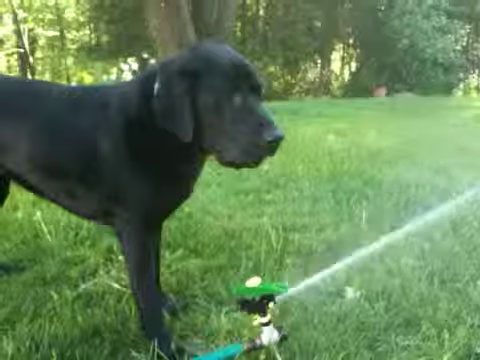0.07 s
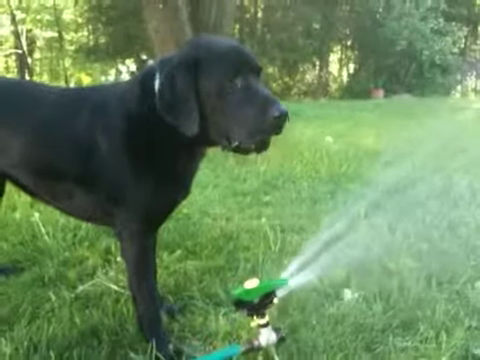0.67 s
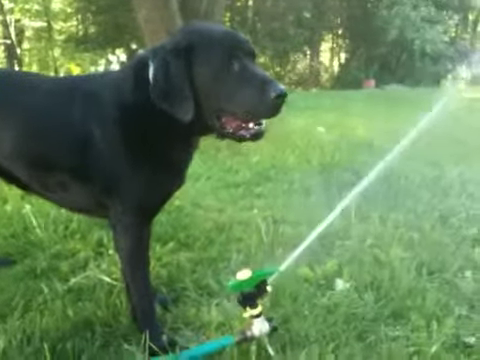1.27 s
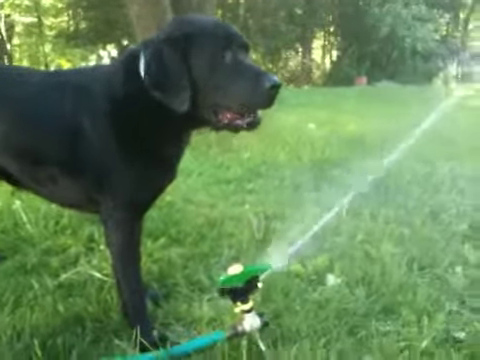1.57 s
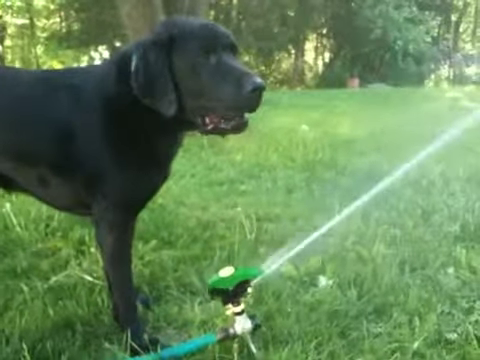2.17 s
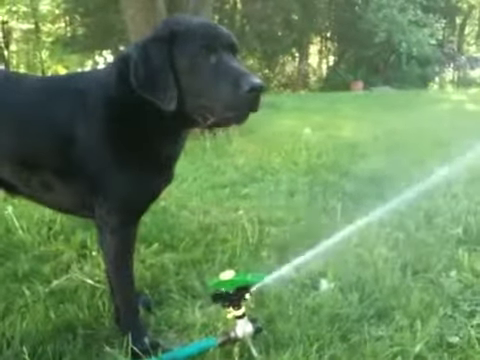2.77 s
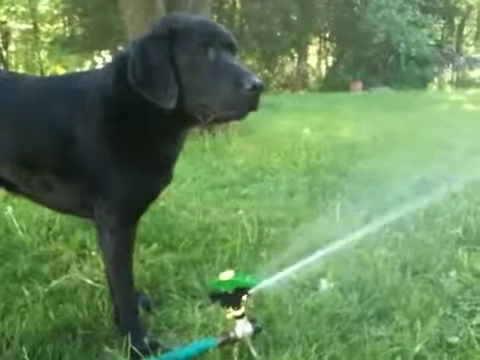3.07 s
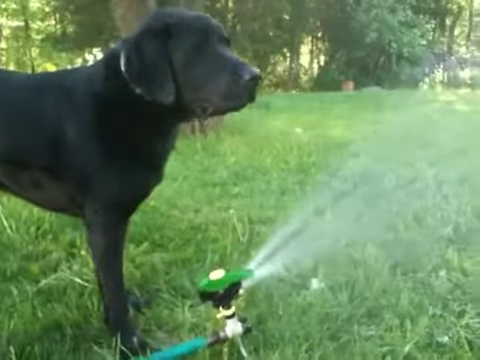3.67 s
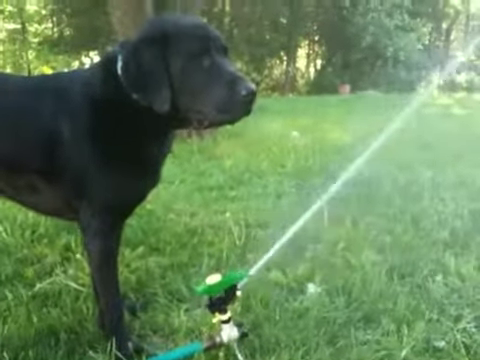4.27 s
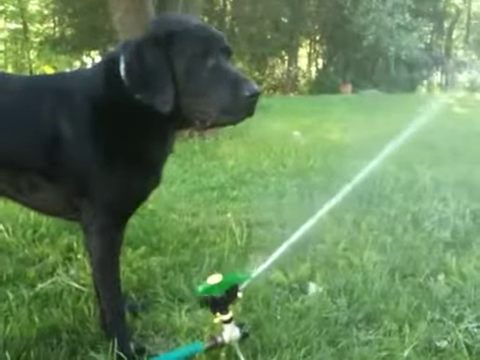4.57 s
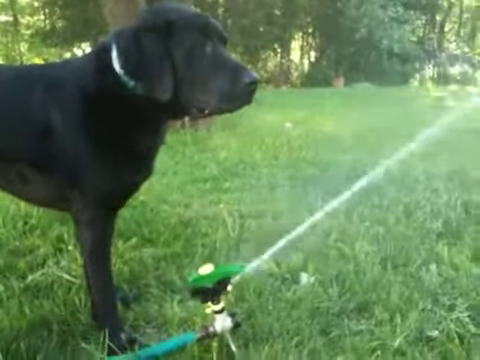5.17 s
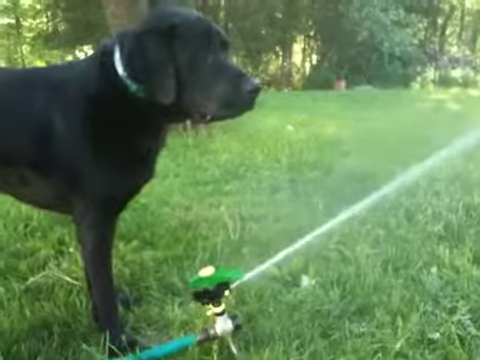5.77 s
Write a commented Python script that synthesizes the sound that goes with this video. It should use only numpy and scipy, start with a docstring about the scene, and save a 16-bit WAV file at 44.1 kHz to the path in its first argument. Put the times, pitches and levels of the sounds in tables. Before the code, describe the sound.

An impact sprinkler is heard close up on a lawn, its water jet hissing throughout. The sound starts just after the beginning with two sharp, wet ticks. From about 0.3 to 1.1 seconds the arm chatters quickly, roughly thirty short bursts of spray a second. At 1.2 seconds it settles into even ticking, about eight strokes a second, each a hard clack with a splash and a very short metallic ring. Around 2 seconds the hiss flares briefly and turns from broad to thinner and brighter. From 3.3 to 4.1 seconds the fast ratcheting chatter returns, with the spray swelling. Regular ticking resumes at about 4.2 seconds and carries on until the end, near 6 seconds. Soft outdoor air lies behind everything, with a few very faint, short, distant hoots at the start and around 2.4 seconds.

```python
"""A garden lawn, with a small microphone close to an impact sprinkler. The sprung arm slaps into the jet
eight times a second, tears up the water, cracks against the frame and steps the head round. Twice the
trip lever flips and the arm chatters the head back in short, fast strokes. Between strokes the jet
hisses, broad at first, then keen. Behind it lie soft outdoor air and a few faint, far hoots."""
import sys
import numpy as np
from scipy import signal
from scipy.fft import rfft, irfft, next_fast_len
from scipy.io import wavfile
from scipy.ndimage import uniform_filter1d, map_coordinates

SR = 44100
rng = np.random.default_rng(int(sys.argv[2]) if len(sys.argv) > 2 else 0)


def unload_wav(signal):
    """Save mono or channel-first audio to the path in sys.argv[1] as 16-bit WAV at rate SR, clipped to [-1, 1]."""
    wavfile.write(
        sys.argv[1],
        SR,
        np.round(np.clip(np.atleast_2d(signal).T, -1, 1) * 32767).astype(np.int16),
    )


N = 260631

# Open air all round the microphone. Each row: frequency in Hz, relative level in dB.
AIR_COLOUR = [(25, -33.5), (80, -14.5), (170, 0), (280, -2), (420, -2.5), (800, -0.5), (1500, -3.5),
              (4000, 3), (16000, -18.5)]
# Hoots, far off. Each row: start in seconds, length in seconds, pitch in Hz, level in dB.
FAR_HOOTS = [(0.137, 0.04, 561, -61.5), (0.258, 0.077, 629, -64.5), (2.37, 0.085, 710, -61.5),
             (2.495, 0.056, 656, -57.5)]

# The hiss turns from broad to keen. Each row: time in seconds, keen share from 0 to 1.
KEEN_SHARE = [(1.4, 0), (1.8, 0.46), (2.3, 0.93), (5.9, 0.99)]
# The free jet, broad and keen, and its brief flare. Each row: frequency in Hz, relative level in dB.
BROAD_JET_COLOUR = [(60, -40), (300, -34), (1200, -5), (1800, -8), (2500, -18.5), (3500, -8), (4400, -1),
                    (5300, 2), (6400, -1), (7400, 1), (10000, 0.5), (12500, -1), (14000, -6), (16000, -14)]
KEEN_JET_COLOUR = [(60, -54), (300, -32.5), (1200, -13), (2900, -14), (3700, -5.5), (5000, -1),
                   (6750, -10.5), (7500, 2), (8700, 4.5), (9700, -9), (11200, -17), (12600, 3.5),
                   (14000, -17.5), (15200, -4), (16000, -9.5)]
TREBLE_FLARE_COLOUR = [(1000, -14), (4000, 6.5), (7000, -21), (10000, 10), (14000, 6), (16000, -9.5)]
# Resonances and notches of nozzle and head. Each row: centre in Hz, width in Hz, lift in dB.
NOZZLE_MODES = [(1802, 226, 11), (2789, 220, 9), (3548, 130, 8), (3890, 140, -3.5), (3990, 170, 7.5),
                (5560, 300, 2.5), (6100, 280, 11), (6100, 170, -1), (7100, 140, 10), (7460, 160, 12),
                (7400, 150, -9), (7820, 182, 4), (9540, 400, 0), (10360, 290, 9), (11330, 250, -7),
                (11670, 320, 7)]
# The band a reflection colours as the head turns. Each row: time in seconds, centre in Hz, gain in dB.
REFLECTION_BAND = [(1.4, 4400, 3.5), (1.65, 4700, -15), (1.8, 5500, -11), (2.05, 5630, -3), (2.3, 6350, -3),
                   (2.85, 6450, 3), (3.2, 6560, -15), (4.3, 6650, -2.5), (4.6, 5370, -3), (5.9, 6720, -1)]
# Three bands of hiss that come and go at the nozzle. Each row: time in seconds, pitch in Hz, level in dB.
HIGH_HISS = [(.1, 8700, -54), (1.5, 8360, -57.5), (2.3, 8440, -69.5), (2.85, 8750, -44), (3.25, 8450, -67),
             (4.25, 8430, -44), (4.65, 8480, -45.5), (5.0, 8550, -53), (5.9, 8840, -52)]
THIN_WHISTLE = [(.1, 6350, -57), (1.35, 6260, -54.5), (1.52, 6370, -56.5), (1.76, 6630, -53),
                (2.1, 6500, -66), (2.6, 6500, -74), (3.2, 6460, -62.5), (4.3, 6360, -56), (4.65, 6290, -51),
                (5.35, 6340, -51.5), (5.9, 6370, -54)]
HOLLOW_HISS = [(.1, 3890, -64), (1.45, 3774, -53.5), (1.65, 3653, -56), (1.95, 3760, -53), (2.3, 3854, -62),
               (4.2, 3760, -56), (4.7, 3686, -53), (5.9, 3810, -62.5)]

# Swings of the head, out and back, the first already under way. Each row: first full stroke in seconds,
# starting gap between slow strokes in seconds, gap between return strokes in seconds.
HEAD_SWEEPS = [(-1.692, .12225, .03255), (1.3228, .12225, .03273), (4.3415, .12197, .03273)]
# Slow strokes of the arm, a slack one leading each new sweep. Each row: time in seconds, then the
# relative levels in dB of the splash, the blow on the frame and the click.
SLOW_STROKES = [(0.154, 1.37, 1.5, -6.0), (0.2779, 0.3, 1, -4), (1.1951, -1, -5.5, -3.5),
                (1.3221, 0.12, 2.5, -1), (1.4448, -1.5, 1, -1), (1.5681, 2, 1.5, -3),
                (1.6895, 0.1, -0.5, 3), (1.8125, 0, 0.5, 2.5), (1.9349, -0.6, -0.8, 5.5),
                (2.0579, -0.5, 1, 7), (2.1807, 1.4, 1.38, -21), (2.3042, -0.3, 1.5, 3),
                (2.4275, 0.5, 1.7, 3), (2.5509, 1.5, 2.5, 2), (2.6744, 1.5, -0.5, -7),
                (2.7983, 1.5, 1.8, -5.5), (2.9217, 1.6, 1.5, -7), (3.0448, 2.3, 0.2, 4),
                (3.1679, -0.2, 2, -0.5), (3.2916, 1.2, 0.5, -10), (4.2143, 0, -5, -7),
                (4.342, 2.4, 1.5, 1.0), (4.464, -1.0, 1.8, -2), (4.5866, 3, 0.5, 0.5),
                (4.7083, 0.07, 1, -2), (4.8303, 2.28, 0, 2), (4.9531, 0.7, -0.2, -1.0),
                (5.0754, 2.2, 0.3, -5), (5.1981, 2, 2, -5), (5.3201, 0.5, 2.3, 3.5), (5.444, 1.7, 2.0, 0),
                (5.5671, 1.4, 2.1, -2.0), (5.691, 2, 1, -6), (5.8133, -1, 1.3, -1)]
# Water torn up by the arm, broad and keen. Each row: frequency in Hz, relative level in dB.
BROAD_SPLASH_COLOUR = [(1760, -40), (3000, -6.5), (3200, -11), (3650, -45), (4290, 0.5), (4600, -12),
                       (5330, 4), (5750, -7.5), (7050, 5.5), (8110, 0.5), (9270, -1), (10100, -0.5),
                       (11600, -1.5), (16000, -37)]
KEEN_SPLASH_COLOUR = [(1940, -35), (3300, -24), (3970, -11.5), (4780, -7.5), (5750, -9), (6300, -19),
                      (7150, -3.5), (7940, 3), (9010, -1), (11200, -18.5), (12800, -12.5), (13900, -27.5),
                      (15200, -10.5), (16000, -22)]
# Resonances that colour the torn water. Each row: centre in Hz, width in Hz, lift in dB.
SPLASH_MODES = [(4830, 280, 2), (6350, 210, 7.5), (6630, 200, 0), (7630, 330, 0), (9266, 270, -2),
                (11300, 320, -2.5), (11530, 340, 2)]
# The stand's jolt, then the arm's wet knock, first slap on the water and blow on the frame.
# Each row: frequency in Hz, relative level in dB.
THUD_COLOUR = [(60, -40), (130, -7), (200, -1.5), (280, 2), (380, -12), (700, -10), (1500, -16.5)]
KNOCK_COLOUR = [(60, -26), (300, -31), (550, -33), (900, -11.5), (1350, -3), (1560, -4), (1760, 1.5),
                (2200, -7), (3000, -1.5), (3700, -8), (5500, 4), (12000, -52)]
SNAP_COLOUR = [(500, -28), (3000, -19.5), (5000, -4), (6700, -21), (7500, 5), (8300, 2.5), (10000, -15),
               (13000, -10), (16000, -11)]
CLACK_COLOUR = [(50, -59), (150, -42), (500, -18.5), (1000, -16), (1600, -7), (2300, -13.5), (3200, -7.5),
                (4500, 0), (6300, 0.5), (8000, -10.5), (10000, -9), (13000, -6), (16000, -26)]
# The resonance of the stand. Its row: centre in Hz, width in Hz, lift in dB.
STAND_MODES = [(272, 70, 1)]
# Modes of the wet frame. Each row: pitch in Hz, relative level in dB, seconds to fall by 60 dB.
FRAME_MODES = [(840, -17, 0.026), (1292, -19, 0.0425), (1710, -9.5, 0.037), (1983.5, -6, 0.023),
               (2538, -1.5, 0.026), (2721, -5, 0.026), (3710, -5, 0.027), (4615, -1, 0.03),
               (4816, 5, 0.022), (5720, 1.5, 0.037)]

# Layer gains. Each: dB at the start of a sweep, dB added across it, dB added as the hiss turns keen.
JET_DB, SPLASH_DB, CHATTER_DB = (-47, 4, 3.5), (-32, 4, 3.5), (-36.5, 3.5, 3.5)
KNOCK_DB, SNAP_DB = (-41.5, 1.5, 1.5), (-28.5, -4, 5)
RING_DB, CLACK_DB = (-42, -1, 11.5), (-23, 0, -2)
START_S = .12  # the sound sets in here


def amp(db):
    return 10 ** (np.asarray(db) / 20)


def unit(x):
    return x / np.sqrt(np.mean(x ** 2) + 1e-20)


def curves(rows):
    """One value per sample for each column after the time."""
    s, *cols = np.transpose(rows)
    return [np.interp(np.arange(N) / SR, s, c) for c in cols]


def wobble(rate):
    """A smooth random curve, rate knots a second."""
    return map_coordinates(rng.standard_normal(int(N * rate / SR) + 4), [np.arange(N) * rate / SR])


def add(track, s, sound):
    """Mix a sound into a track from time s."""
    place = track[round(s * SR):][:len(sound)]
    place += sound[:len(place)]


def coloured(x, spectrum, modes=()):
    """Causal filter of unit power gain: a smooth spectrum with resonances on top."""
    size = 2 * next_fast_len(N // 2 + 8192)
    hz = np.fft.rfftfreq(size, 1 / SR)
    f, level = np.transpose(spectrum)
    db = np.interp(np.log(hz + 1), np.log(f), level)
    for centre, width, lift in modes:
        db = db + lift / (1 + (2 * (hz - centre) / width) ** 2)
    cepstrum = irfft(np.log(np.maximum(unit(amp(db)), 1e-6)))
    cepstrum[1:size // 2] *= 2  # minimum phase: nothing rings ahead of a blow
    cepstrum[size // 2 + 1:] = 0
    return irfft(rfft(x, size) * np.exp(rfft(cepstrum)), size)[:N]


def sweep(first_s, gap_s, return_gap_s, steps=17, return_steps=25, slowing_s=.0001, trip_s=.0312):
    """Stroke times of one swing: out, each a little slower, then fast back once the lever trips."""
    gaps = gap_s + slowing_s * (np.arange(steps - 1) + .5)
    out = first_s + np.r_[0, np.cumsum(gaps)]
    return out, out[-1] + trip_s + return_gap_s * np.arange(return_steps)


def return_strokes():
    """Middles of the fast strokes, in seconds."""
    return [s for row in HEAD_SWEEPS for s in sweep(*row)[1] if START_S < s < N / SR]


def heading():
    """Where the head points: it moves from 0 to 1, then runs back."""
    turns = []
    for row in HEAD_SWEEPS:
        out, back = sweep(*row)
        turns += [(out[0], 0), (out[-1], 1), (back[-1], 0)]
    return curves(turns)[0]


def keenness():
    """Share of the keen hiss, from 0 to 1."""
    return np.clip(curves(KEEN_SHARE)[0], 0, 1)


def layer_gain(gains_db):
    """A layer's gain at the microphone follows the heading and the keenness of the hiss."""
    start_db, sweep_db, keen_db = gains_db
    return amp(start_db + sweep_db * heading() + keen_db * keenness())


def droplets(grain_db, rate):
    """White noise of rms 1 that comes in clumps, as water tears into drops."""
    return unit(rng.standard_normal(N) * amp(grain_db * wobble(rate)))


def water(broad, keen, modes, grain_db, rate):
    """Spray noise whose colour glides between a broad and a keen hiss."""
    share = keenness()
    return (np.sqrt(1 - share) * coloured(droplets(grain_db, rate), broad, modes)
            + np.sqrt(share) * coloured(droplets(grain_db, rate), keen, modes))


def garden_air(level_db=-56.5, drift_db=.7):
    """Soft outdoor air behind everything, its level drifting a little."""
    return amp(level_db + drift_db * wobble(4)) * coloured(rng.standard_normal(N), AIR_COLOUR)


def far_hoots(blur=.55, blur_hz=170):
    """Faint hoots of level pitch, blurred by distance."""
    track = np.zeros(N)
    for s, length, hz, db in FAR_HOOTS:
        swell = signal.windows.tukey(int(length * SR), .5)
        phase = 2 * np.pi * hz * np.arange(N) / SR
        tone = (1 + blur * wobble(blur_hz)) * np.sin(phase) + blur * wobble(blur_hz) * np.cos(phase)
        add(track, s, amp(db) * swell * tone[:len(swell)])
    return track


def narrow_hiss(rows, width_hz, waver_db=1.5):
    """A narrow, wavering band of noise that follows a pitch and a level."""
    hz, level_db = curves(rows)
    phase = 2 * np.pi * np.cumsum(hz) / SR
    band = unit(wobble(width_hz) * np.cos(phase) + wobble(width_hz) * np.sin(phase))
    return amp(level_db + waver_db * wobble(8.8)) * band


def nozzle_sizzle():
    """A high hiss, a thin whistle and a wider, hollow band ring at the lip of the nozzle."""
    return (narrow_hiss(HIGH_HISS, width_hz=680)
            + narrow_hiss(THIN_WHISTLE, width_hz=340)
            + narrow_hiss(HOLLOW_HISS, width_hz=950))


def treble_flare(middle_s=1.99, half_s=0.074, level_db=-43.5):
    """The hiss turns brighter for a moment."""
    swell = np.exp(-((np.arange(N) / SR - middle_s) / half_s) ** 2)
    return amp(level_db) * swell * coloured(rng.standard_normal(N), TREBLE_FLARE_COLOUR)


def jet(crest_s=1.985, period_s=.427, swell_db=2, mist_db=6, flutter_db=2.0, drift_db=0.2):
    """Close by, the free jet hisses, swells and flutters; mist builds up as the head runs back."""
    turn = heading()
    running_back = uniform_filter1d(1.0 * (np.gradient(turn) < 0), size=SR // 60)
    cycle = np.cos(2 * np.pi * (np.arange(N) / SR - crest_s) / period_s)
    swell = keenness() * (1 - running_back) * cycle
    mist = running_back * (1 - turn)
    hiss_db = swell_db * swell + mist_db * mist + flutter_db * wobble(40) + drift_db * wobble(16)
    hiss = water(BROAD_JET_COLOUR, KEEN_JET_COLOUR, NOZZLE_MODES, grain_db=2.0, rate=740)
    return layer_gain(JET_DB) * amp(hiss_db) * hiss


def head_reflection(hiss, half_width_hz=332):
    """As the head turns, a short reflection hollows, or slightly lifts, a moving band of the hiss."""
    hz, t, spectra = signal.stft(hiss, SR, nperseg=512)
    s, centre_hz, gain_db = np.transpose(REFLECTION_BAND)
    band = np.exp(-((hz[:, None] - np.interp(t, s, centre_hz)) / half_width_hz) ** 2)
    return signal.istft(spectra * amp(np.interp(t, s, gain_db) * band), SR, nperseg=512)[1][:N]


def colour_patches(hiss, depth_db=1.75, patch_hz=350, patch_s=.07):
    """The colour of the hiss shifts at random, in narrow and short-lived patches."""
    hz, t, spectra = signal.stft(hiss, SR, nperseg=512)
    field = rng.standard_normal(spectra.shape)
    field = uniform_filter1d(field, size=max(1, round(patch_hz / hz[1])), axis=0)
    field = uniform_filter1d(field, size=max(1, round(patch_s / t[1])), axis=1)
    return signal.istft(spectra * unit(amp(depth_db * unit(field))), SR, nperseg=512)[1][:N]


def stand_thuds(blow_db=-36, recoil_s=0.015, recoil_db=-35, return_lag_s=0.0105, return_db=-35,
                swing_s=.016, swing_db=-41, broad_db=1.0, scatter_db=2.0, jitter_s=.001):
    """The stand jolts as the arm strikes, and again as the jet throws the arm back out."""
    jolts = []
    for s, *_ in SLOW_STROKES:
        jolts += [(s, blow_db), (s + recoil_s, recoil_db)]
    for s in return_strokes():
        jolts += [(s + return_lag_s - swing_s, swing_db), (s + return_lag_s, return_db)]
    force = np.zeros(N)
    for (s, db), (late, hard, way) in zip(jolts, rng.standard_normal((len(jolts), 3))):
        add(force, s + jitter_s * late, [np.sign(way) * amp(db + scatter_db * hard)])
    return coloured(amp(broad_db * (1 - keenness())) * force, THUD_COLOUR, STAND_MODES)


def arm_knocks(outward_s=0.01041, inward_s=0.02147, t60_s=0.041, attack_s=0.0006, jitter_s=0.00098,
               scatter_db=2.0, recoil_s=0.0151, recoil_db=-4):
    """Between return bursts the arm knocks at the end of its short swing and slaps back into the jet."""
    t = np.arange(SR // 16) / SR
    shape = (1 - np.exp(-t / attack_s)) * amp(-60 * t / t60_s)
    force = np.zeros(N)
    strokes = [s for row in HEAD_SWEEPS for s in sweep(*row)[1][:-1] if START_S < s < N / SR]
    for s in strokes:
        for lag in (outward_s, inward_s):
            late, hard = rng.standard_normal(2)
            add(force, s + lag + jitter_s * late, amp(scatter_db * hard) * shape)
    for s, splash_db, _, _ in SLOW_STROKES:  # one knock as the arm is thrown clear
        add(force, s + recoil_s, amp(recoil_db + splash_db) * shape)
    return layer_gain(KNOCK_DB) * coloured(force * droplets(grain_db=1.5, rate=1100), KNOCK_COLOUR)


def return_chatter(first_burst_s=.0168, last_burst_s=.019, end_s=.0095, entry_s=.0016, exit_s=.0011,
                   jitter_s=.0007, scatter_db=.5, stray_s=.005, slap_s=.00085, slap_db=.5,
                   spill_s=.02, spill_db=-18, kick_db=2.5):
    """Running back, the arm hardly leaves the jet: uneven bursts of spray, stray slaps, spill between."""
    t = np.arange(N) / SR
    length = last_burst_s + (first_burst_s - last_burst_s) * heading()
    power = np.zeros(N)
    for s in return_strokes():
        late, size, *slaps = rng.standard_normal(5)
        near = np.abs(t - s) < .05
        age = t[near] - s
        since_entry = age - end_s + length[near] - jitter_s * late
        opening = 1 / (1 + np.exp(-since_entry / entry_s))
        closing = 1 / (1 + np.exp((age - end_s) / exit_s))
        burst = amp(scatter_db * size) ** 2 * opening * closing
        spikes = sum((age > stray_s * at) * np.exp(-np.abs(age - stray_s * at) / slap_s) for at in slaps)
        spill = amp(spill_db) ** 2 * np.exp(-(age / spill_s) ** 2)
        power[near] += burst * (1 + amp(slap_db) ** 2 * spikes) + spill
    spray = water(BROAD_SPLASH_COLOUR, KEEN_SPLASH_COLOUR, SPLASH_MODES, grain_db=1.5, rate=800)
    kick = amp(kick_db * heading() ** 2)  # the arm flails hardest just after the lever trips
    return layer_gain(CHATTER_DB) * kick * np.sqrt(power) * spray


def arm_splashes(lead_s=0.0035, rise_s=0.0014, dwell_s=0.016, release_s=0.0014, sag_db_per_s=190):
    """On each slow stroke the arm stays in the jet for a moment and tears it up."""
    t = np.arange(SR // 12) / SR
    opening = 1 - np.exp(-(t / rise_s) ** 2)
    closing = 1 / (1 + np.exp((t - lead_s - dwell_s) / release_s))
    shape = opening * amp(-sag_db_per_s * t) * closing
    flow = np.zeros(N)
    for s, splash_db, _, _ in SLOW_STROKES:
        add(flow, s - lead_s, amp(splash_db) * shape)
    spray = water(BROAD_SPLASH_COLOUR, KEEN_SPLASH_COLOUR, SPLASH_MODES, grain_db=2, rate=900)
    return layer_gain(SPLASH_DB) * flow * spray


def water_snaps(lag_s=0.0002, rise_s=0.0003, t60_s=0.00382, spike_db=8):
    """Each slow stroke opens with a click, hard or soft, and a short, bright slap on the water."""
    t = np.arange(SR // 40) / SR
    shape = (1 - np.exp(-(t / rise_s) ** 2)) * amp(-60 * t / t60_s)
    force = np.zeros(N)
    for s, _, _, click_db in SLOW_STROKES:
        slap = shape / shape.max() * rng.standard_normal(len(t))
        slap[np.argmax(shape)] = amp(spike_db)
        add(force, s + lag_s, amp(click_db) * slap)
    return coloured(layer_gain(SNAP_DB) * force, SNAP_COLOUR)


def frame_ring(attack_s=0.00057, scatter_db=1.0, detune=.012):
    """Each blow rings the short modes of the wet frame at slightly new strengths and pitches."""
    t = np.arange(SR // 12) / SR
    hz, db, t60 = np.transpose(FRAME_MODES)[:, :, None]
    track = np.zeros(N)
    for s, _, blow_db, _ in SLOW_STROKES:
        size, tune, phase = rng.standard_normal((3, len(FRAME_MODES), 1))
        decay = amp(db + scatter_db * size - 60 * t / t60)
        modes = decay * np.sin(2 * np.pi * (hz * (1 + detune * tune) * t + phase))
        add(track, s, amp(blow_db) * (1 - np.exp(-t / attack_s)) * modes.sum(0))
    return layer_gain(RING_DB) * track


def arm_clacks(t60_s=0.021, rebound_s=0.0043, rebound_db=-12, graze_s=0.0056, graze_db=-17,
               cushion_s=0.0011):
    """The arm grazes the jet, cracks against the frame through a film of water and rebounds once."""
    t = np.arange(SR // 20) / SR
    force = np.zeros(N)
    for s, _, blow_db, _ in SLOW_STROKES:
        late, hard = rng.standard_normal(2)
        blow = amp(blow_db) * (1 - np.exp(-(t / cushion_s) ** 2)) * amp(-60 * t / t60_s)
        add(force, s - graze_s, amp(graze_db) * blow)
        add(force, s, blow)
        add(force, s + rebound_s * np.exp(0.18 * late), amp(rebound_db + 2 * hard) * blow)
    return coloured(layer_gain(CLACK_DB) * force * rng.standard_normal(N), CLACK_COLOUR)


def scene():
    """One spot on the lawn, in mono: spray and blows close up, the garden behind."""
    hiss = colour_patches(head_reflection(jet()) + nozzle_sizzle())
    spray = hiss + arm_splashes() + return_chatter() + treble_flare()
    blows = water_snaps() + arm_clacks() + frame_ring() + arm_knocks() + stand_thuds()
    return (spray + blows + garden_air() + far_hoots())[None]


def record(dry, bass_cut_hz=61, top_hz=16000):
    """After a moment of silence the small microphone takes it in, losing deep bass and the very top."""
    running = np.arange(N) / SR >= START_S
    size = next_fast_len(N + 8192)
    hz = np.fft.rfftfreq(size, 1 / SR)
    response = hz / np.hypot(hz, bass_cut_hz) * (hz < top_hz)
    return irfft(rfft(dry * running, size) * response, size)[:, :N]


dry = scene()
out = record(dry)
unload_wav(out)
```